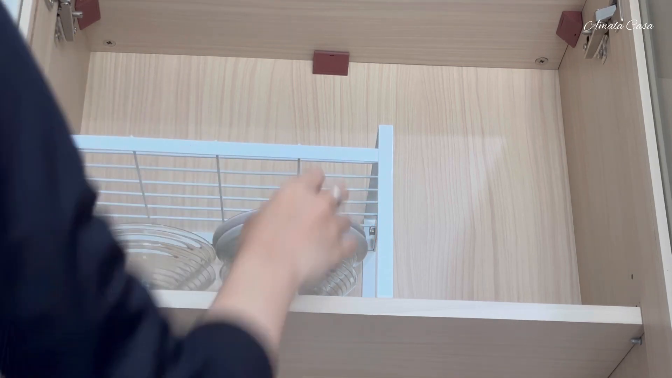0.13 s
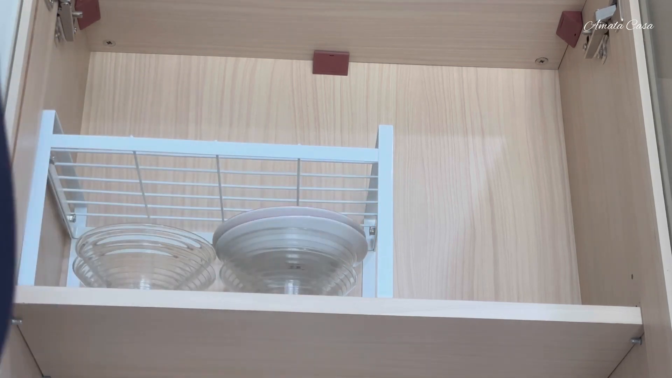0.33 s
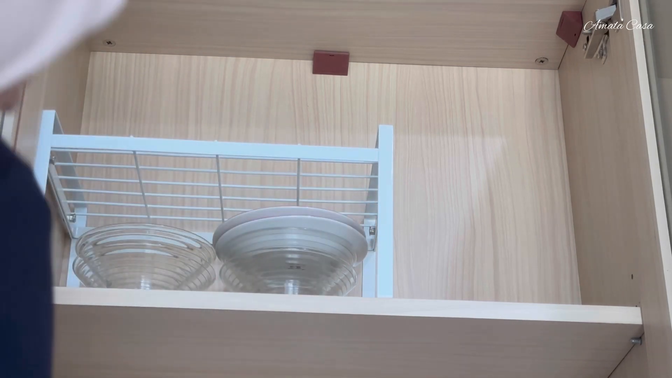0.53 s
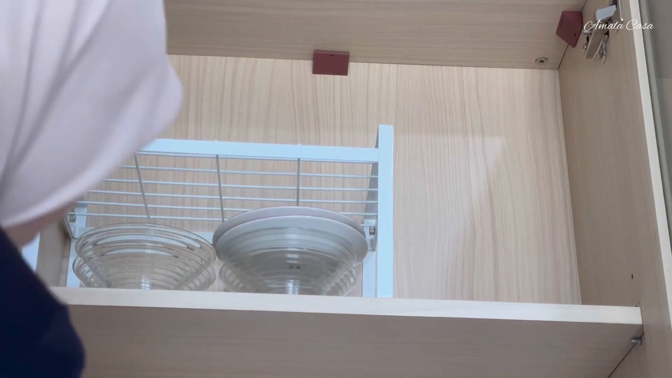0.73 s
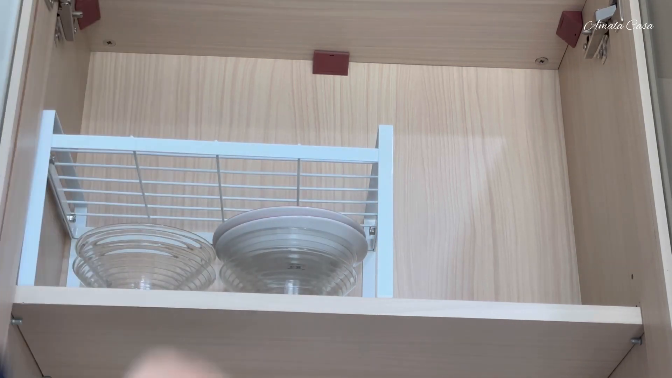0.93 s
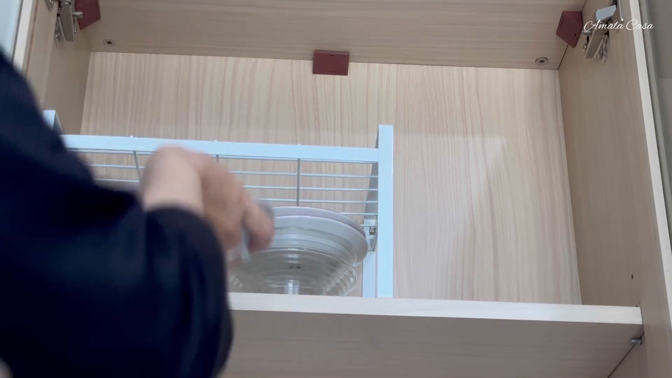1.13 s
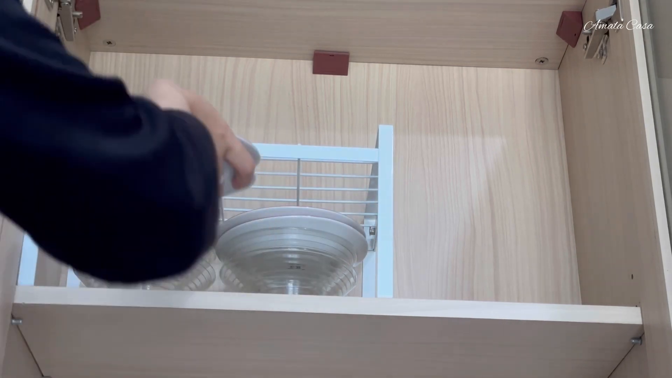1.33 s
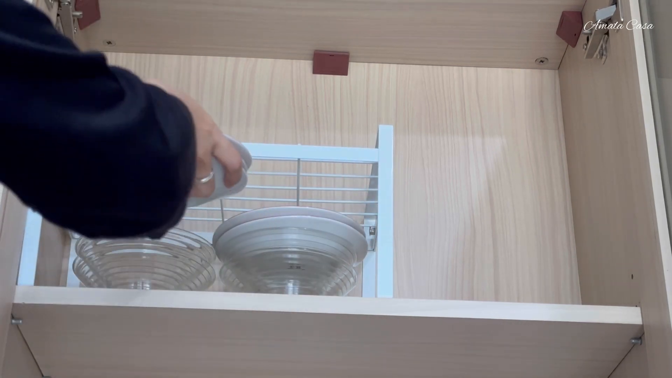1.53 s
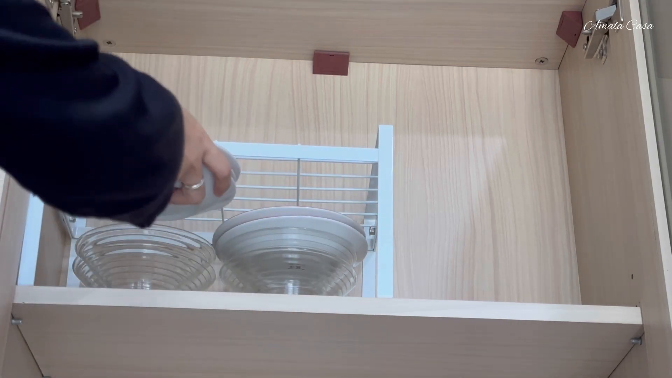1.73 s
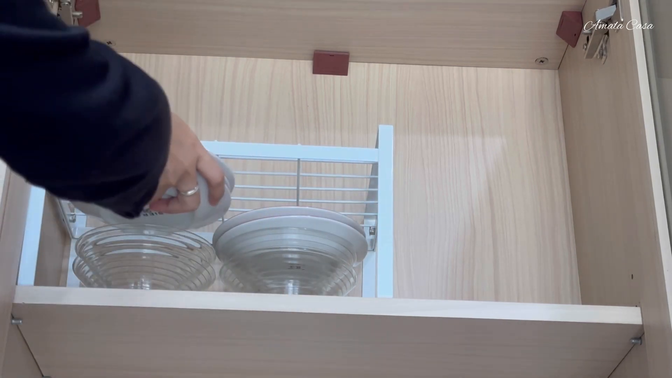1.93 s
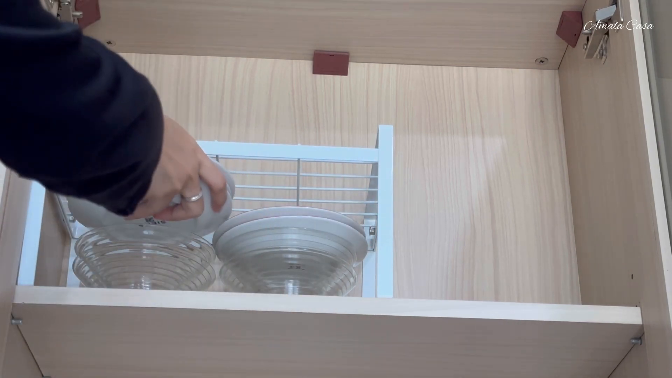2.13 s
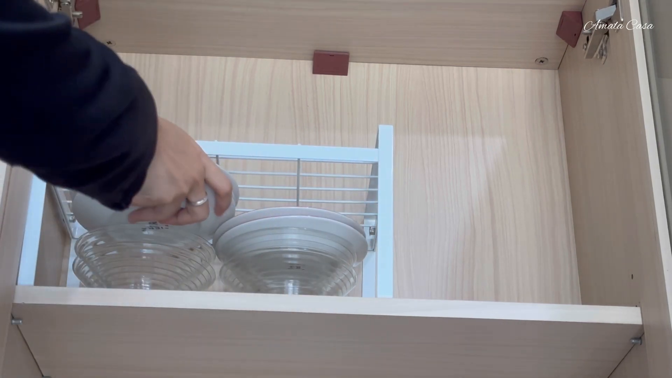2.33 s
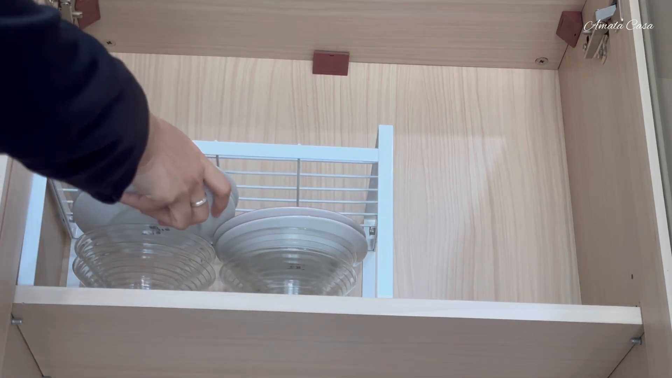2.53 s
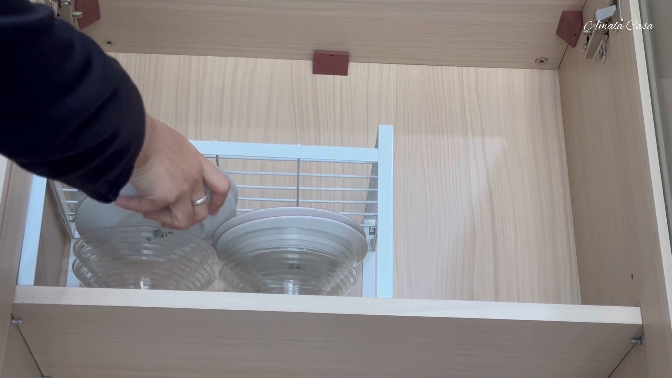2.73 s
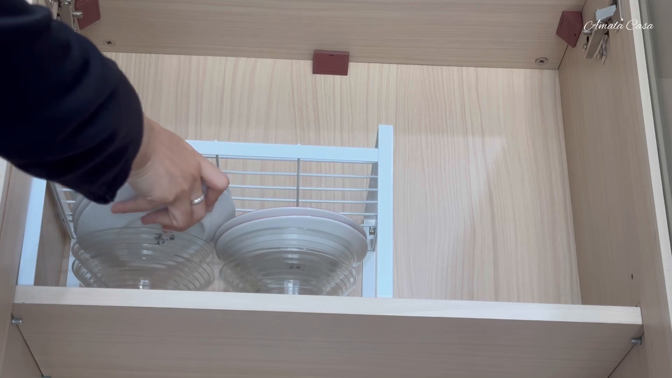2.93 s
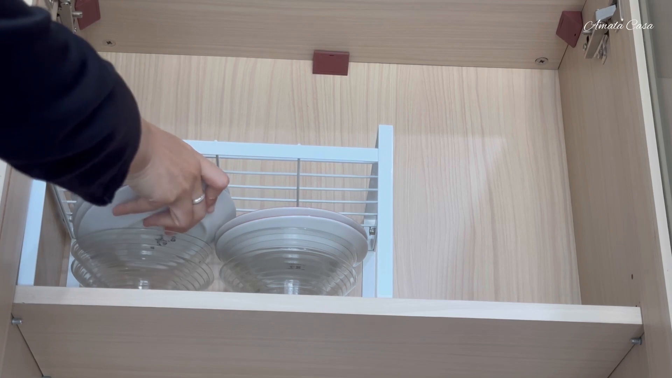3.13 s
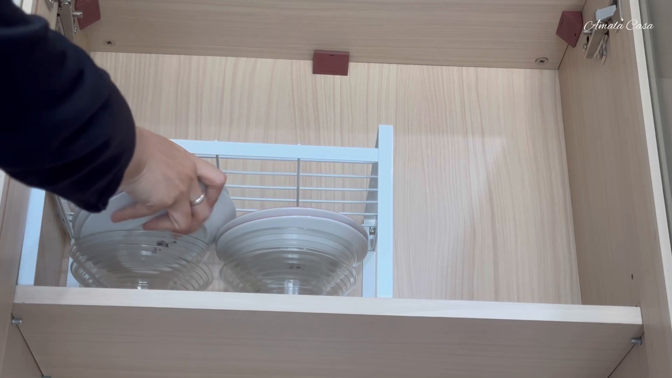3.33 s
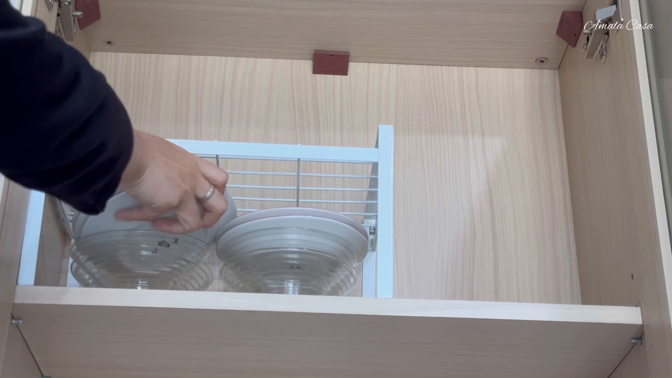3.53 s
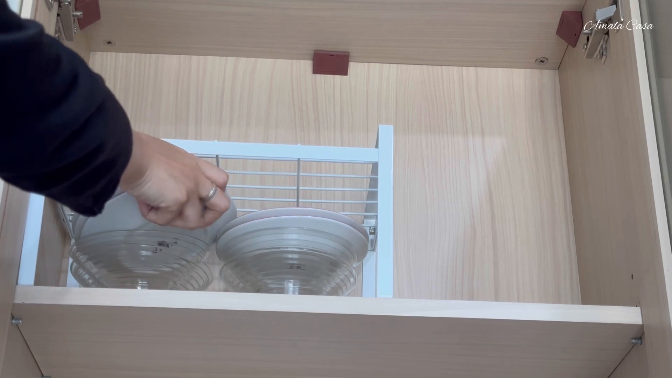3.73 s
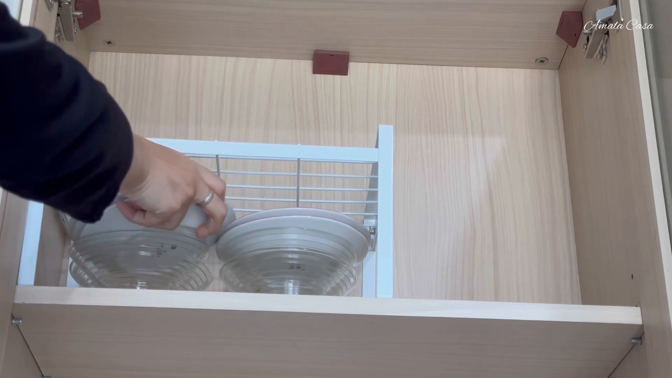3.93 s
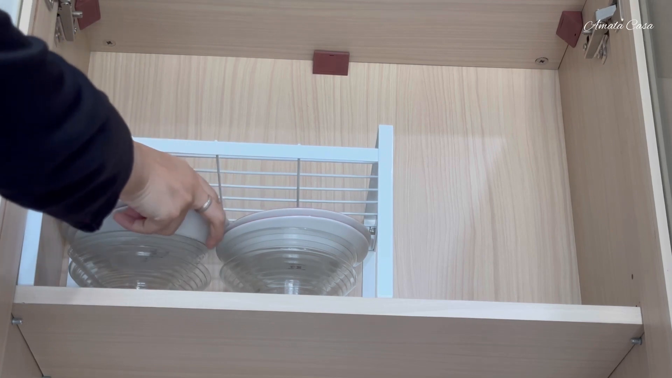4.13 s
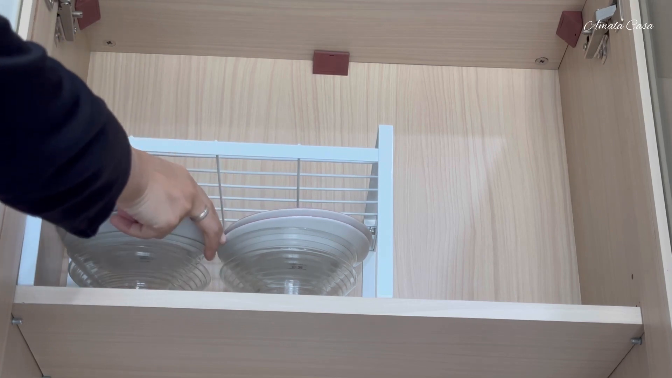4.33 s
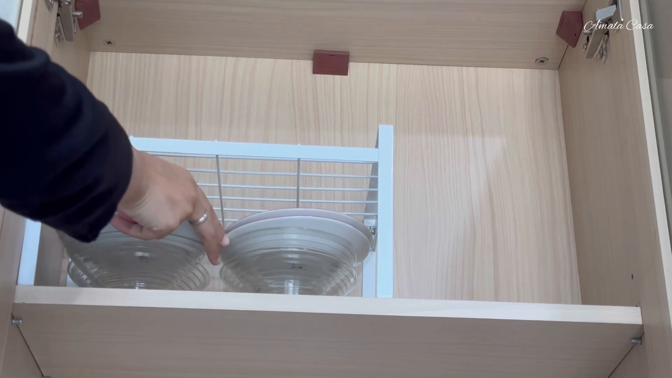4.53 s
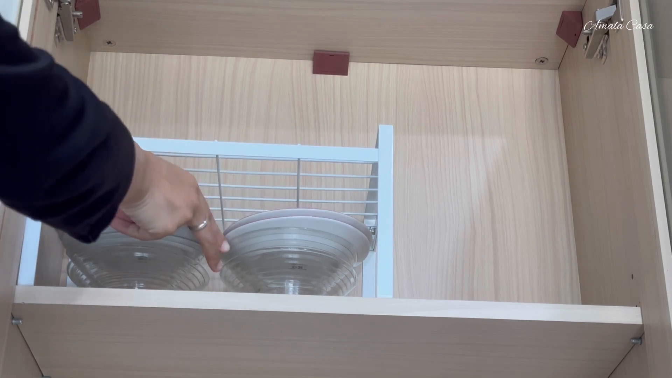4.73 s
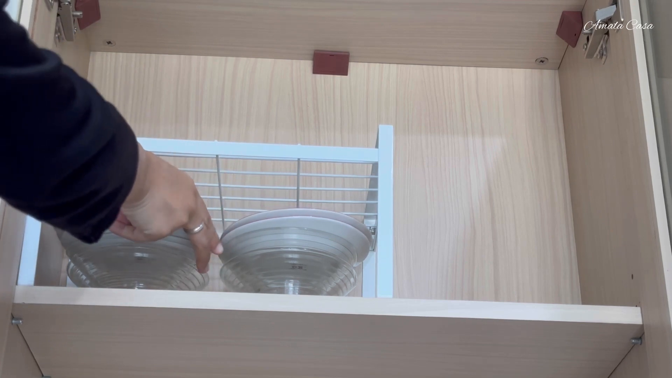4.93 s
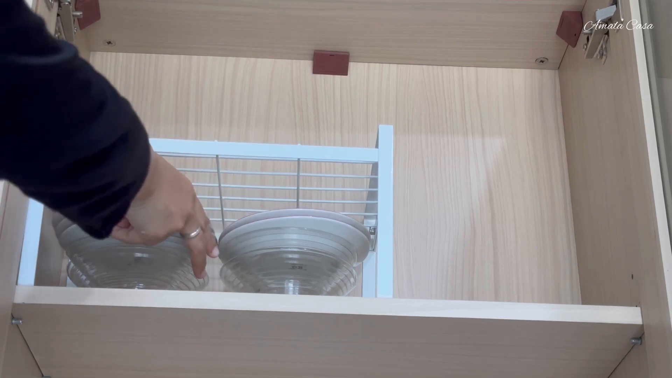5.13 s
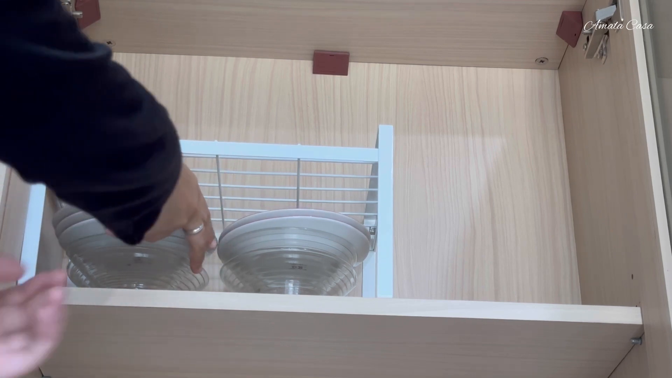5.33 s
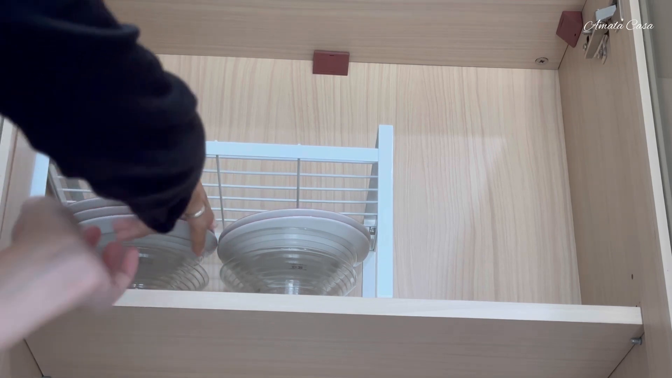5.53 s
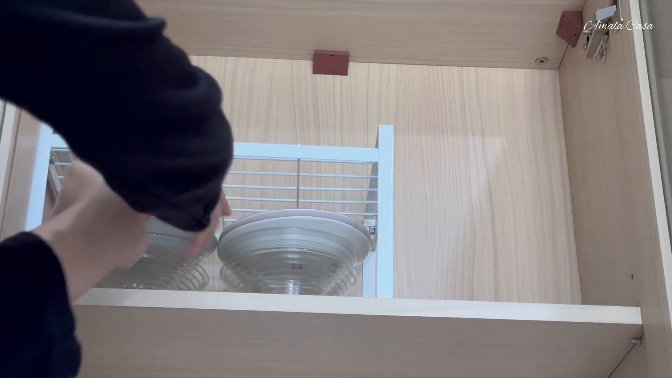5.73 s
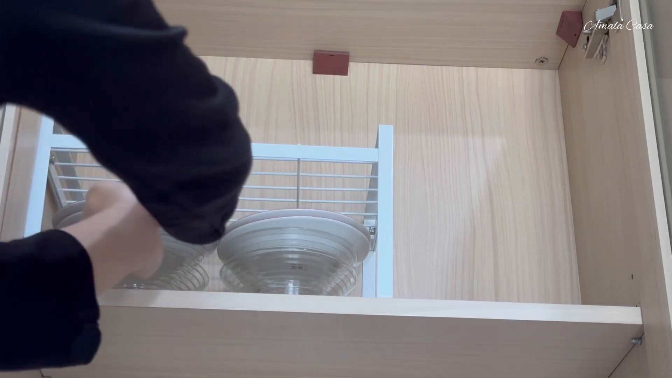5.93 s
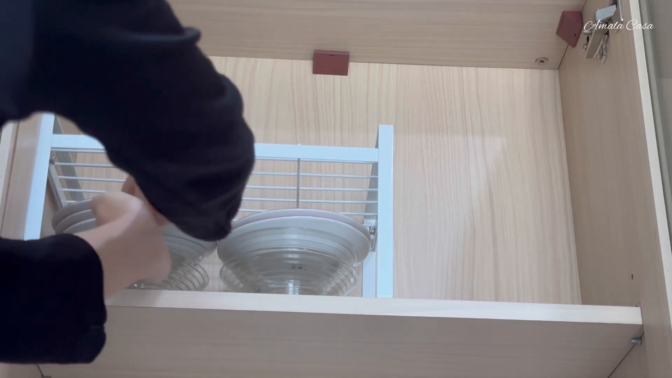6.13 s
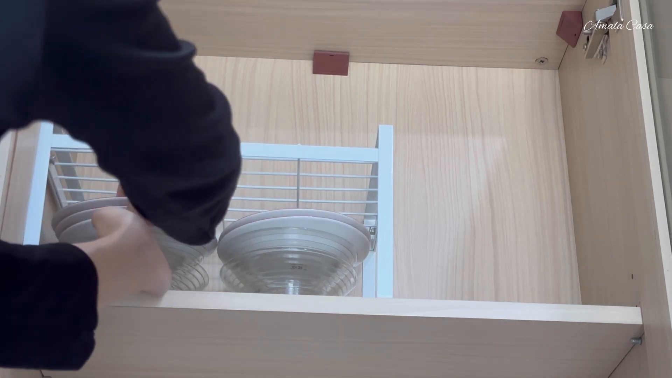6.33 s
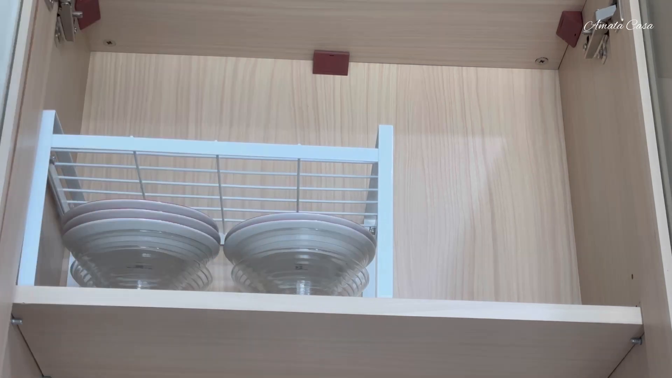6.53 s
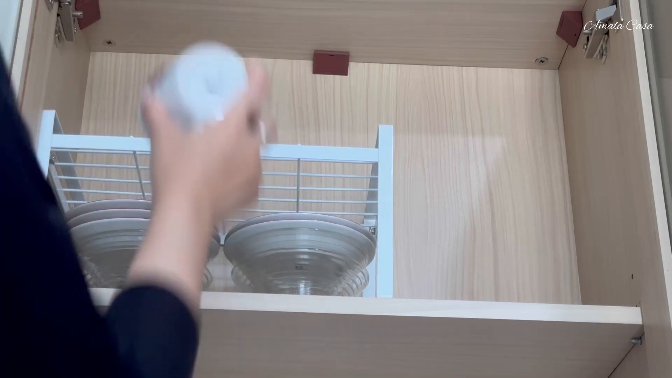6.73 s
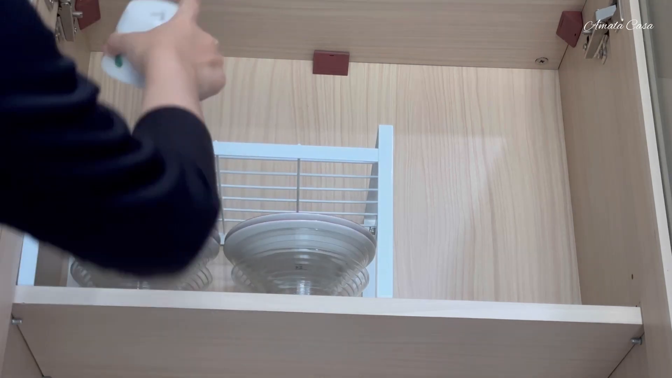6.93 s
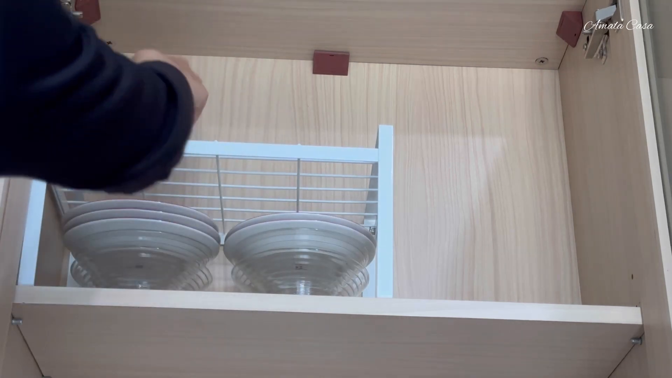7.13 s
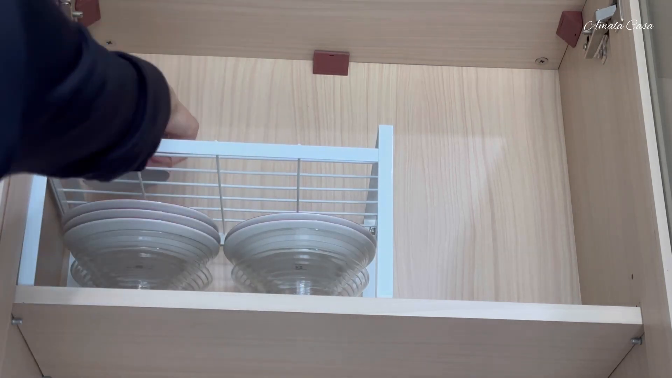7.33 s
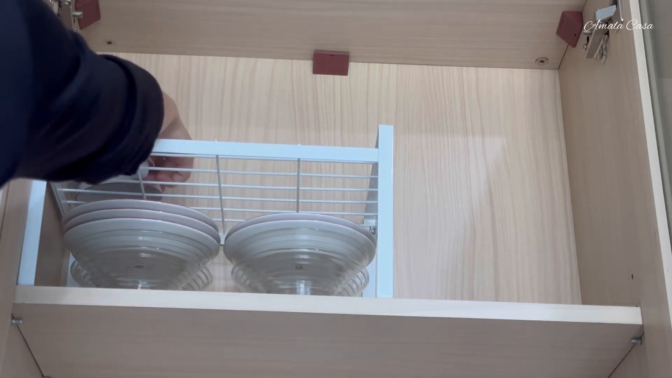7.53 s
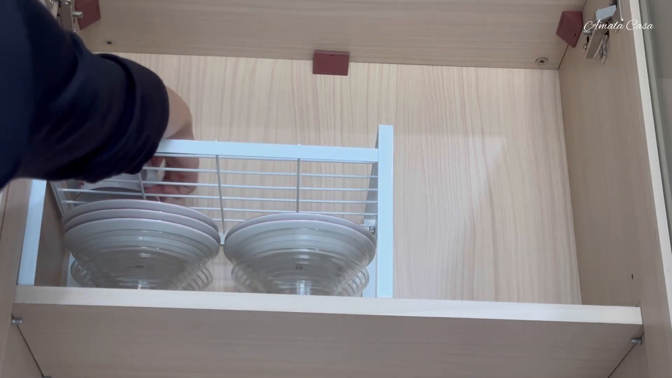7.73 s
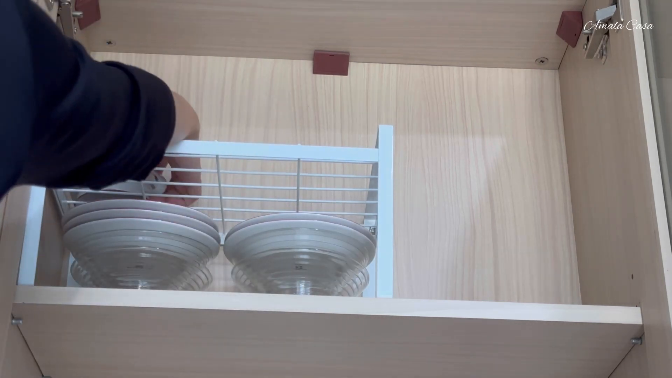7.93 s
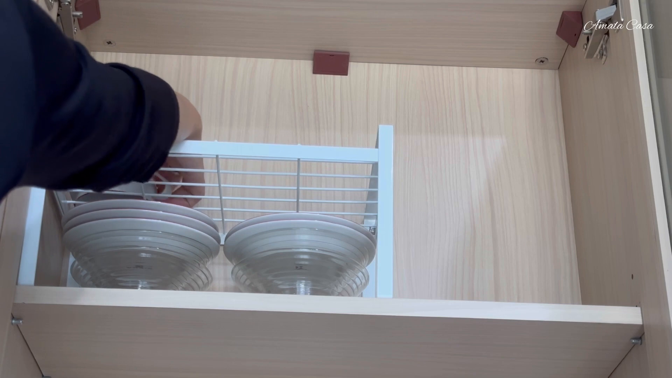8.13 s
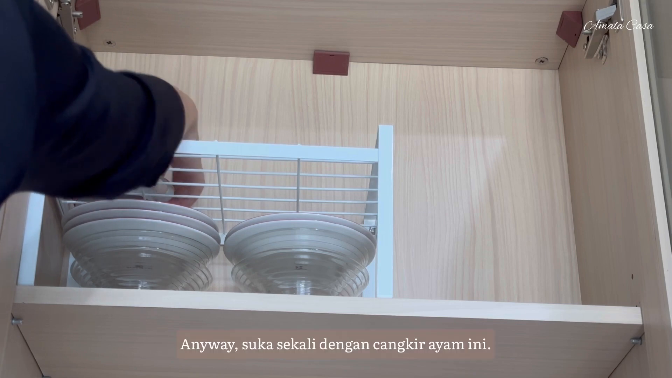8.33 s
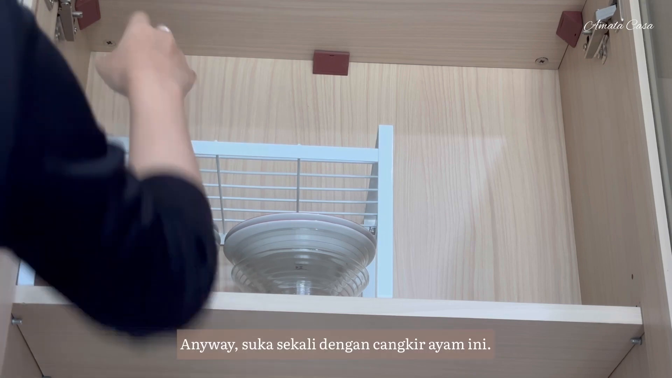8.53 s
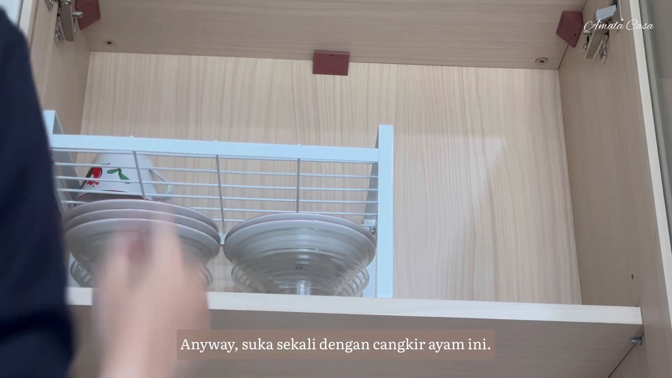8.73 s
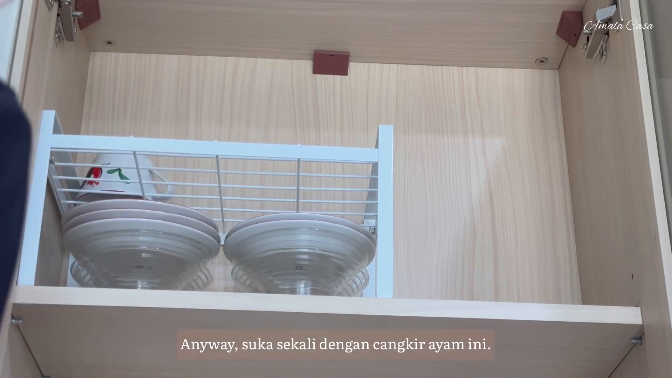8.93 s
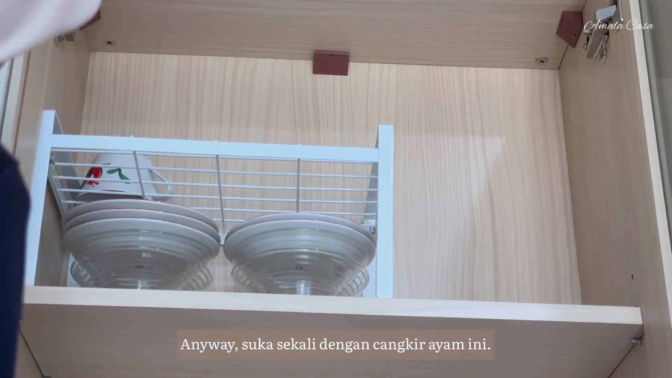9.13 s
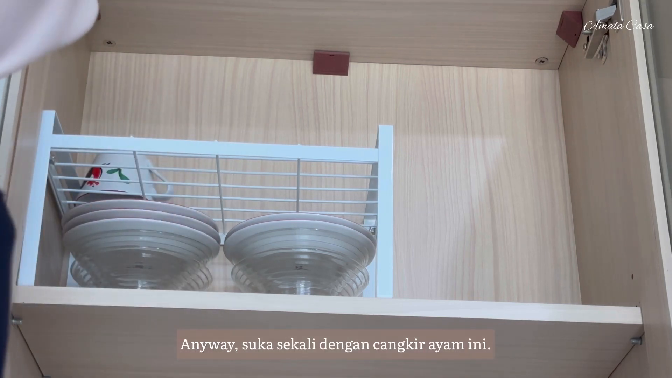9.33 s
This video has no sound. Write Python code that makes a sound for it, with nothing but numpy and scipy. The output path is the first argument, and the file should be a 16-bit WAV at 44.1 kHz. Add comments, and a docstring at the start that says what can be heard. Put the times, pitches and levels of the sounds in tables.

```python
"""A quiet kitchen: filtered-noise rumble and a faint whine of wavering sines lie under everything; noise makes a sizzle and a sleeve.
Two dull wooden knocks come first, then a plate is rubbed in tiny random slips; short gliding tones squeak and one rings high.
It clinks against two stacks in the wire dish rack of a wooden wall cabinet, drags along the wires and settles in soft bumps.
Then a china cup knocks onto the upper tier and rocks to rest; a last soft bump of the plate closes the scene.
Each knock, clink or bump mixes decaying modes with a dense noise burst for the cabinet and the kitchen's tail."""
import sys
import numpy as np
from scipy import signal
from scipy.fft import rfft, irfft, next_fast_len
from scipy.io import wavfile
from scipy.ndimage import map_coordinates

SR = 44100
rng = np.random.default_rng(int(sys.argv[2]) if len(sys.argv) > 2 else 0)


def bounce(signal):
    """Save signal as a 16-bit WAV file at the path given by the first command-line argument."""
    frames = np.transpose(np.atleast_2d(signal))
    limited = np.clip(frames, -1, 1)
    pcm = np.round(limited * 32767).astype(np.int16)
    wavfile.write(sys.argv[1], SR, pcm)


N = 414099  # samples


def amp(db):
    """Decibels as an amplitude factor."""
    return 10 ** (np.asarray(db) / 20)


def rms(x):
    """Root mean square, kept above zero."""
    return np.sqrt(np.mean(x ** 2) + 1e-24)


def along(points, hz):
    """Read a curve of (Hz, value) points along a log frequency axis."""
    f, value = np.transpose(points)
    return np.interp(np.log(hz + 1), np.log(f + 1), value)


def wobble(rate, n):
    """A smooth random curve with rate knots a second."""
    knots = rng.standard_normal(int(n * rate / SR) + 4)
    return map_coordinates(knots, [np.arange(n) * rate / SR])


def filtered(x, response):
    """Multiply the spectrum of x by a response of frequency."""
    n = x.shape[-1]
    padded = next_fast_len(n + 4096)
    spectrum = rfft(x, padded) * response(np.fft.rfftfreq(padded, 1 / SR))
    return irfft(spectrum, padded)[..., :n]


# Stereo width of a small space. Each row: frequency in Hz, side against mid in dB.
STEREO_WIDTH = [(60, -24), (200, -13), (380, -11.5), (680, -1.5), (1300, -16.5), (2600, -28), (4500, -23.5),
                (7000, -10.5), (15000, -7)]


def spread(pair, colour):
    """Turn two unrelated signals into a coloured left and right around a mid of rms 1."""
    def mid_and_side(hz):
        return colour(hz) * np.array([np.ones_like(hz), amp(along(STEREO_WIDTH, hz))])
    mid, side = filtered(pair, mid_and_side)
    return np.array([mid + side, mid - side]) / rms(mid)


def rush(spectrum):
    """Steady stereo noise with a given spectrum."""
    return spread(rng.standard_normal((2, N)), lambda hz: amp(along(spectrum, hz)))


def add(out, s, sound):
    """Mix a sound into out from time s in seconds."""
    start = round(s * SR)
    part = sound[:, :max(N - start, 0)]
    out[:, start:start + part.shape[1]] += part


STROKE_EDGE_DB, STROKE_ROUND = 20.5, 1.5  # fall at the ends of swell and fade; 1 = pointed, 2 = bell-shaped


def strokes(rows):
    """Hand movements and passing swells as one gain per sample: each rises to its peak and fades."""
    t = np.arange(N) / SR
    power = np.zeros(N)
    for s, swell, fade, db in rows:
        away = np.maximum((s - t) / swell, (t - s) / fade)
        power += amp(db - STROKE_EDGE_DB * np.minimum(away, 10) ** STROKE_ROUND) ** 2
    return np.sqrt(power)


# Spectrum of the room's rumble. Each row: frequency in Hz, relative density in dB per Hz.
RUMBLE_COLOUR = [(22, -30.5), (42, -10.5), (62, 3), (85, -8.5), (150, -10), (250, -19), (500, -27),
                 (750, -34.5), (1500, -36), (2300, -39), (3100, -37), (3700, -45.5), (7000, -52.5),
                 (16000, -60)]


def room_rumble(room_db=-50.5):
    """Steady noise, weighted to the lows, as the bed of the room."""
    return amp(room_db) * rush(RUMBLE_COLOUR)


# Partials of the whine. Each row: frequency in Hz, level in dB before the common lift.
WHINE_PARTIALS = [(490, -80), (585, -81), (1378, -87), (2611, -78.5), (2659, -86), (2859, -88), (2955, -87),
                  (3155, -78.5), (3203, -88), (3350, -89), (6130, -94), (6207, -89)]
WHINE_LIFT_DB, WHINE_WANDER_DB = 4, 1


def appliance_whine(phase_drift=.35, flutter_db=1.5):
    """Thin sines with wandering phase (radians), each fluttering in level under one slow common wander."""
    t = np.arange(N) / SR
    level = amp(WHINE_LIFT_DB + WHINE_WANDER_DB * wobble(1, N))
    whine = np.zeros(N)
    for hz, db in WHINE_PARTIALS:
        flutter = amp(db + flutter_db * wobble(7.2, N))
        whine += flutter * np.sin(2 * np.pi * hz * t + phase_drift * wobble(12, N))
    return level * whine


# Passes of a faint, narrow, high sizzle. Each row: peak in seconds, swell and fade in seconds, level in dB.
SIZZLE_PASSES = [(.58, .25, .15, -71), (4.95, .6, 0.28, -73.5), (5.3, .25, .75, -67.5),
                 (6.9, 0.77, 0.53, -74.5)]
SIZZLE_HZ, SIZZLE_WIDTH_HZ = 3140, 75


def sizzle():
    """Noise through one narrow resonance that comes and goes."""
    def resonance(hz):
        return 1 / (1 + ((hz - SIZZLE_HZ) / SIZZLE_WIDTH_HZ) ** 2)
    return strokes(SIZZLE_PASSES) * spread(rng.standard_normal((2, N)), resonance)


# Arm movements. Each row: peak in seconds, swell and fade in seconds, level in dB.
ARM_MOVES = [(.45, 1.3, 1.8, -69), (3.9, .8, 0.66, -74.5), (5.45, 0.37, 1, -73.5), (7.1, .95, 0.49, -65.5),
             (8.6, 0.52, 0.86, -67.5)]
# Hiss of the cloth. Each row: frequency in Hz, relative density in dB per Hz.
CLOTH_COLOUR = [(1000, -10), (3000, -0.5), (5500, 1.5), (7300, -0.5), (10000, -5), (12500, -12),
                (15500, -10)]


def sleeve():
    """Cloth hisses as bright noise that follows the arm."""
    return strokes(ARM_MOVES) * rush(CLOTH_COLOUR)


# Four registers of a blow: knock, body, clink, sparkle. Each row: low edge in Hz, high edge in Hz.
BLOW_REGISTERS = [(90, 600), (600, 2000), (2000, 7600), (8500, 16000)]
# Reverberation of the kitchen. Each row: frequency in Hz, t60 in seconds.
KITCHEN_T60 = [(120, 0.93), (350, 0.51), (1000, 0.58), (3000, 0.42), (6500, 0.43), (14000, 0.2)]


def blow(levels_db, modes, clatter, ring_db, lift_db, width_hz, cabinet_t60, kitchen_db, rise, ripple_db=3):
    """One contact: ringing modes, a dense burst in the cabinet and the kitchen's own tail."""
    t = np.arange(int(.7 * SR)) / SR
    attack = slice(0, int(.022 * SR))  # levels are set over the first 22 ms

    def colour(f):
        # the reflections are strongest around the frequencies that the object radiates
        peaks = sum(amp(db + lift_db) / (1 + ((f - hz) / width_hz) ** 2) for hz, db, _ in modes)
        return amp(along(clatter, f)) + peaks

    def ripple(f):
        # nearby panels reinforce some frequencies and cancel others, differently for each contact
        return amp(ripple_db * map_coordinates(rng.standard_normal(256), [f / 110], order=1))

    burst = spread(rng.standard_normal((2, len(t))), lambda f: colour(f) * ripple(f))
    hz, when, bins = signal.stft(burst, SR, nperseg=256)
    cabinet_fade = amp(-60 * when / cabinet_t60)
    kitchen_fade = amp(kitchen_db - 60 * when / along(KITCHEN_T60, hz)[:, None])
    faded = bins * np.hypot(cabinet_fade, kitchen_fade)
    dense = signal.istft(faded, SR, nperseg=256)[1][:, :len(t)]

    # each contact point favours other modes
    chance = rng.standard_normal((len(modes), 2))
    ring = np.zeros(len(t))
    for (hz, db, t60), (favour_db, phase) in zip(modes, chance):
        ring += amp(db + favour_db - 60 * t / t60) * np.sin(2 * np.pi * (hz * t + phase))

    sound = dense / rms(dense[:, attack]) + amp(ring_db) * ring / rms(ring[attack])
    sound = sound * (1 - np.exp(-t / rise))  # the reflections take a moment to pile up

    # weight and hardness of the contact set the strength of each register
    out = np.zeros_like(sound)
    for db, band in zip(levels_db, BLOW_REGISTERS):
        part = signal.sosfilt(signal.butter(4, band, "bandpass", fs=SR, output="sos"), sound)
        out += amp(db) * part / rms(part[:, attack])
    return out


# Dense, unpitched part of a cup or wood blow. Each row: frequency in Hz, relative density in dB per Hz.
CUP_AND_WOOD_CLATTER = [(90, -9.5), (170, -2.5), (350, 2.5), (650, -7), (1350, -1.5), (1900, -14.5),
                        (2600, -5.5), (3300, -12.5), (5300, -18.5), (6300, -22), (10000, -35), (16000, -46)]
# Hollow double knock. Each row: start in seconds, level in dB.
WOOD_KNOCKS = [(0.666, -40), (0.692, -40)]
# Modes of the wood. Each row: frequency in Hz, relative level in dB, t60 in seconds.
WOOD_RING = [(216, -11, 0.44), (497, 1, 0.064), (558, 1, 0.21), (688, -14, 0.33), (810, -11.5, .15),
             (1065, -20, 0.23), (1570, -11.5, 0.12), (2013, -21, 0.13)]
# Knock, body, clink and sparkle against the blow's level, in dB.
WOOD_BALANCE_DB = (0.5, -3, -13.5, -20)


def wood():
    """Wood gives two dull knocks in quick succession, with broad, quickly damped modes."""
    out = np.zeros((2, N))
    for s, db in WOOD_KNOCKS:
        levels_db = db + np.array(WOOD_BALANCE_DB)
        add(out, s, blow(levels_db, WOOD_RING, CUP_AND_WOOD_CLATTER, ring_db=1.0, lift_db=6.0, width_hz=130,
                         cabinet_t60=.1, kitchen_db=-9.0, rise=0.00078))
    return out


def friction(moves, colour, slips_per_s, scatter_db, echo_t60):
    """Tiny slips of random timing, size and sign, each smeared by the cabinet."""
    happens = rng.random(N) < slips_per_s / SR
    slips = happens * amp(scatter_db * rng.standard_normal(N)) * rng.choice([-1, 1], N)
    t = np.arange(SR // 4) / SR
    echo = rng.standard_normal((2, len(t))) * amp(-60 * t / echo_t60)
    pair = signal.fftconvolve(slips[None], echo, axes=1)[:, :N]
    return strokes(moves) * spread(pair, lambda hz: amp(along(colour, hz)))


# Short dry rubs as a plate is picked up. Each row: peak in seconds, swell and fade in seconds, level in dB.
PICKUP_RUBS = [(.948, 0.03, 0.0056, -51.5), (1.045, .03, .17, -52.5)]
# Tone of the rub. Each row: frequency in Hz, relative density in dB per Hz.
DRY_RUB_COLOUR = [(500, -34), (1200, 1), (2000, 3.5), (3000, 7), (4000, -12), (6500, -10), (10000, -18),
                  (16000, -38)]


def rub():
    """Dense, uneven slips scrape in the upper mids."""
    return friction(PICKUP_RUBS, DRY_RUB_COLOUR, slips_per_s=1700, scatter_db=7.5, echo_t60=0.072)


# Short pushes over the wires. Each row: peak in seconds, swell and fade in seconds, level in dB.
WIRE_DRAGS = [(2.76, 0.12, 0.27, -41), (3.86, 0.099, 0.17, -46.5), (4.1, 0.18, 0.22, -44),
              (4.35, .14, 0.2, -51.5), (4.88, 0.088, 0.055, -45.5), (4.99, 0.056, 0.064, -44),
              (5.19, 0.12, 0.2, -50)]
# Tone of the rack. Each row: frequency in Hz, relative density in dB per Hz.
RACK_COLOUR = [(120, -6), (185, 4.5), (230, -13.5), (320, 2), (400, 8.5), (540, -6.5), (700, -2),
               (900, -11), (1400, -19), (2400, -13.5), (3800, -28), (6500, -31.5), (10000, -42.5),
               (16000, -50)]


def drag():
    """The plate drags over the wires and its sparser slips sound the rack, low and hollow."""
    return friction(WIRE_DRAGS, RACK_COLOUR, slips_per_s=270, scatter_db=4.0, echo_t60=0.085)


# Squeaks of rubbed glass and, in the last row, one high, swelling glass ring.
# Each row: middle in seconds, length in seconds, start pitch in Hz, end pitch in Hz,
# level in dB, step from each partial to the next in dB.
GLASS_GLIDES = [(0.934, 0.02, 883, 1050, -50, -16), (1.17, 0.048, 1070, 1210, -57, -15),
                (1.328, 0.02, 1305, 1234, -46, -5.5), (2.702, .1, 433, 345, -44, -11),
                (2.721, 0.097, 1037, 1243, -49.5, -21), (2.776, 0.064, 6670, 6530, -42.5, -40)]


def gliding_tones(waver=0.017, echo_db=-5, echo_t60=0.088):
    """Short gliding tones, unsteady and briefly echoed: squeaks of rubbed glass and one high, swelling glass ring."""
    out = np.zeros((2, N))
    for s, length, start_hz, end_hz, db, overtone_db in GLASS_GLIDES:
        n = int(length * SR)
        pitch = np.linspace(start_hz, end_hz, n) * (1 + waver * wobble(385, n))
        phase = 2 * np.pi * np.cumsum(pitch) / SR
        tone = sum(amp(db + k * overtone_db) * np.sin((k + 1) * phase) for k in range(3))
        add(out, s - length / 2, np.sqrt(2) * (tone * np.hanning(n))[None])
    t = np.arange(SR // 3) / SR
    echo = spread(rng.standard_normal((2, len(t))), np.ones_like) * amp(-60 * t / echo_t60)
    echo = echo / np.linalg.norm(echo[0])
    return out + amp(echo_db) * signal.fftconvolve(out, echo, axes=1)[:, :N]


# The cup on the wires. Each row: start in seconds, knock level in dB, body level in dB, clink level in dB,
# free ring against clatter in dB.
CUP_TOUCHES = [(7.541, -50, -32, -33, -1), (7.553, -32, -35, -48, 4.5), (7.579, -40, -38, -55, -2),
               (7.867, -33, -34, -41.5, -4.5), (7.923, -26, -36, -51, -11), (7.951, -42, -56, -66, -10),
               (7.975, -46, -35, -45.5, -11), (7.993, -40, -35.5, -55, 2.5),
               (8.138, -40.5, -36.5, -45.5, 1.5), (8.179, -35.5, -42.5, -56, -29)]
# Modes of the china cup. Each row: frequency in Hz, relative level in dB, t60 in seconds.
CUP_RING = [(335, -5, .3), (377, -4, .28), (472, -2, .68), (825, -4, .28), (900, -7, .2), (1254, -3, .23),
            (1405, 0, .27), (1460, -3, .25), (2040, -15, .36), (2256, -16, .32), (2590, -6, .2),
            (2720, -3, .22), (3208, -15, .3), (3666, -23, .3), (4005, -16, .24), (5200, -14, .18),
            (5259, -14, .28), (5360, -17, .25), (7020, -14, .22), (9205, -24, .24), (10550, -22, .18)]
CUP_SPARKLE_DB = -19  # top register against the clink


def cup():
    """The cup touches the upper tier and rings, then rocks against the wires and comes to rest."""
    out = np.zeros((2, N))
    for s, knock_db, body_db, clink_db, ring_db in CUP_TOUCHES:
        levels_db = (knock_db, body_db, clink_db, clink_db + CUP_SPARKLE_DB)
        add(out, s, blow(levels_db, CUP_RING, CUP_AND_WOOD_CLATTER, ring_db, lift_db=-4.5, width_hz=15,
                         cabinet_t60=0.21, kitchen_db=-3.0, rise=0.0027))
    return out


def dish_shares(dish):
    """How much each of the four dishes takes part: 0 held plate, 1 left stack, 2 right stack, 3 seated plate."""
    return np.clip(1 - abs(np.clip(dish, 0, 3) - np.arange(4)), 0, 1)


# Modes of the held plate, the left stack, the right stack and the seated plate, then of the rack's frame,
# which every glass contact shakes. Each row: frequency in Hz, relative level in dB, t60 in seconds.
HELD_PLATE_RING = [(1109, -5, .22), (1297, 2, .27), (1497, -10, .35), (1814, -11, .35), (2283, -5, .33),
                   (2509, 0, .35), (2600, -2, .24), (2700, 0, .22), (2972, -1, .32), (3120, -6, .28),
                   (3230, -8, .28), (4226, -1, .45), (4780, -6, .3), (6130, -11, .3), (6261, -5, .38),
                   (6560, -14, .25), (6783, -14, .22), (8893, -15, .23), (9297, -12, .24), (10520, -22, .2),
                   (11440, -20, .2)]
LEFT_STACK_RING = [(678, -3, .33), (1297, -3, .35), (1696, -4, .16), (1880, -6, .28), (2440, -3, .24),
                   (2616, -1, .3), (2676, -5, .31), (3079, 0, .33), (3320, -6, .24), (3500, -9, .16),
                   (4037, -5, .28), (4780, -7, .2), (4980, -6, .24), (5560, -9, .2), (6126, -10, .26),
                   (6492, -6, .32), (6610, -3, .22), (6675, -3, .33), (6880, -7, .22), (9141, -14, .22),
                   (11040, -11, .2)]
RIGHT_STACK_RING = [(904, 0, .24), (1296, -3, .25), (1480, -4, .29), (2219, -6, .24), (2440, -6, .22),
                    (3106, -3, .33), (3213, -3, .28), (3290, -2, .26), (3407, -2, .24), (3955, -5, .22),
                    (4160, -5, .28), (4350, -10, .33), (4673, -3, .2), (4747, 4, .22), (4892, -1, .24),
                    (6352, 0, .25), (6480, -6, .25), (6600, -4, .28), (6705, -4, .22), (7047, -11, .22),
                    (9103, -11, .25), (9500, -14, .22), (10380, -17, .21), (11940, -19, .15),
                    (14110, -19, .2)]
SEATED_PLATE_RING = [(592, -2, .25), (850, -3, .2), (1650, -4, .16), (1760, -5, .16), (2440, -5, .18),
                     (2643, -2, .2), (3130, -5, .22), (3590, 2, .15), (3900, -3, .15), (4780, -3, .13),
                     (4960, -4, .13), (5200, -3, .15), (5850, -4, .15), (6550, -6, .22), (9350, -15, .16)]
RACK_FRAME_RING = [(184, -3.5, .6), (262, -7, .35), (318, -2, .32), (388, 0, .27), (490, -5, .32),
                   (549, -6, .38), (646, -8, .35), (830, -4, .26), (1060, -7, .22)]
# Dense, unpitched part of a glass blow. Each row: frequency in Hz, relative density in dB per Hz.
GLASS_BURST = [(90, -11), (180, -5.5), (350, 4.5), (550, -2.5), (800, -6.5), (1300, 0.5), (1900, -1.5),
               (2800, 2), (3900, -0.5), (5400, -3.5), (6600, -6.5), (9300, -13.5), (12000, -21),
               (16000, -24.5)]
BUILD_UP_S = .0025  # time for the cabinet's reflections to pile up


def glass_blow(levels_db, dish):
    """One contact rings the dishes that it touches and shakes the frame of the rack."""
    rings = (HELD_PLATE_RING, LEFT_STACK_RING, RIGHT_STACK_RING, SEATED_PLATE_RING)
    modes = []
    for share, table in zip(dish_shares(dish), rings):
        if share > 0:
            modes += [(hz, db + 10 * np.log10(share), t60) for hz, db, t60 in table]
    return blow(levels_db, modes + RACK_FRAME_RING, GLASS_BURST, ring_db=-6.5, lift_db=4.5, width_hz=35,
                cabinet_t60=.1, kitchen_db=-12.5, rise=BUILD_UP_S)


# Glass strikes glass. Each row: start in seconds, clink level in dB, knock in the rack in dB,
# dish number as in dish_shares (a fraction sounds both neighbours).
GLASS_CLINKS = [(2.066, -30.5, -43.5, 0), (2.07, -29.5, -38.5, 0), (2.243, -28, -32.5, 1),
                (2.757, -34.5, -55.5, 0.3), (2.843, -31.5, -39.5, 1.5), (3.192, -20.5, -28.5, 2.04),
                (3.206, -21.5, -28, 2), (3.264, -22, -55.5, 2), (3.844, -47, -36.5, 3),
                (4.157, -41, -39, 2.5), (6.389, -49.5, -43.5, 1)]
# Soft bumps on wires or dishes. Each row: start in seconds, body level in dB, knock in the rack in dB.
SOFT_BUMPS = [(1.031, -55.5, -83), (1.322, -47.5, -91), (2.23, -38.5, -56), (2.559, -44, -42),
              (2.693, -52, -61), (3.177, -54.5, -43), (3.464, -50.5, -41), (4.076, -45, -49.5),
              (4.363, -53, -45), (4.768, -59, -48.5), (4.889, -54.5, -46), (4.964, -45, -48),
              (5.117, -51.5, -53), (5.148, -50.5, -51.5), (5.17, -52, -51), (6.3, -68.5, -53.5),
              (6.73, -67.5, -53.5), (9.366, -54.5, -58)]
# Body and sparkle against the clink, one value in dB for each of the four dishes.
CLINK_BODIES_DB = (-4, -5, -8.5, -6.5)
CLINK_SPARKLES_DB = (-22.5, -13.5, -9, -14)
BUMP_CLINK_DB, BUMP_SPARKLE_DB = -11.5, -30.5  # a soft contact's upper registers against its body
SEATED_S = 3.0  # bumps after this ring the plate leaning on the stack, earlier ones the held plate


def glass():
    """The plate meets the two stacks in hard, bright clinks and the wires or dishes in soft, dull bumps."""
    out = np.zeros((2, N))
    for s, db, knock_db, dish in GLASS_CLINKS:
        shares = dish_shares(dish)
        body_db = db + shares @ CLINK_BODIES_DB
        sparkle_db = db + shares @ CLINK_SPARKLES_DB
        add(out, s, glass_blow((knock_db, body_db, db, sparkle_db), dish))
    for s, db, knock_db in SOFT_BUMPS:
        dish = 3 if s > SEATED_S else 0
        add(out, s, glass_blow((knock_db, db, db + BUMP_CLINK_DB, db + BUMP_SPARKLE_DB), dish))
    return out


def scene():
    """The quiet kitchen with the dishes being put away in it."""
    background = room_rumble() + appliance_whine() + sizzle() + sleeve()
    handling = rub() + drag() + gliding_tones()
    return background + wood() + handling + cup() + glass()


# Phase between the ports. Each row: frequency in Hz, lead of the left in radians.
LEFT_LEAD = [(200, 0), (1400, -.4), (3300, .5), (4700, .3), (6400, .76), (7200, .6), (9300, 1.3),
             (11000, .3)]
# Balance of the ports. Each row: frequency in Hz, left against right in dB.
LEFT_TILT = [(100, 1.6), (550, 1.5), (1500, .25), (8000, 0)]
# Narrow treble dip of the stereo pickup. Each row: frequency in Hz, gain in dB.
TREBLE_DIP = [(7000, -2), (7500, -5), (7850, -21), (8350, -28.5), (8650, -16.5), (8950, 0.5)]
TOP_HZ = 15650  # steep upper band limit


def record(dry):
    """Two close ports, with a narrow treble dip and a band limit."""
    def ports(hz):
        apart = amp(along(LEFT_TILT, hz) / 2) * np.exp(.5j * along(LEFT_LEAD, hz))
        return amp(along(TREBLE_DIP, hz)) * np.array([apart, 1 / apart])

    def band_limit(hz):
        return 1 / np.sqrt(1 + (hz / TOP_HZ) ** 160)
    return filtered(filtered(dry, ports), band_limit)


dry = scene()
out = record(dry)
bounce(out)
```